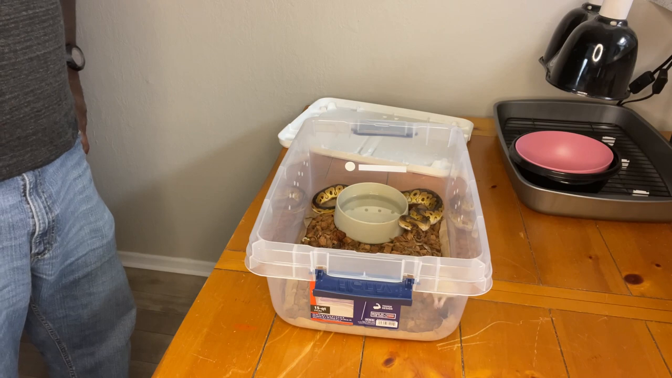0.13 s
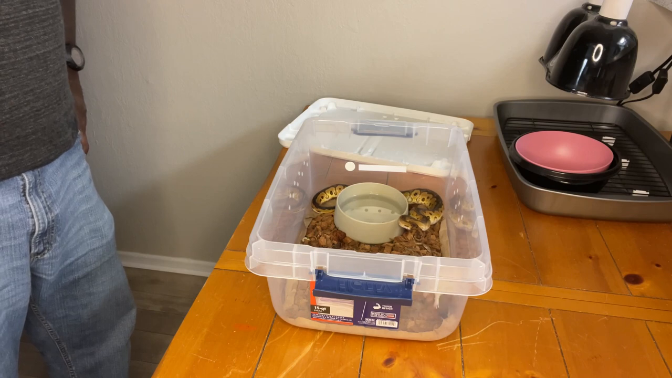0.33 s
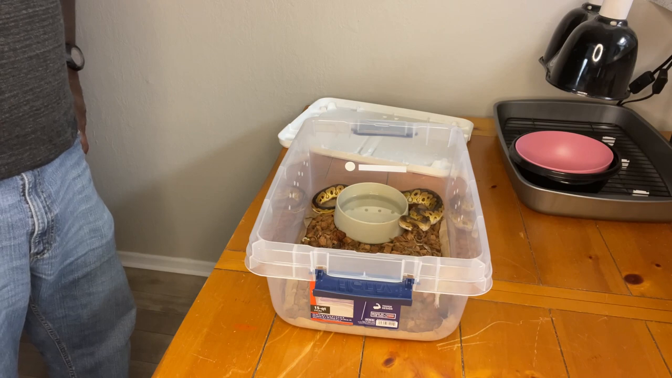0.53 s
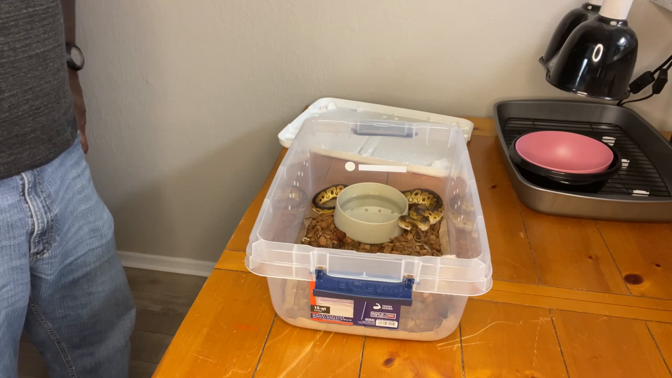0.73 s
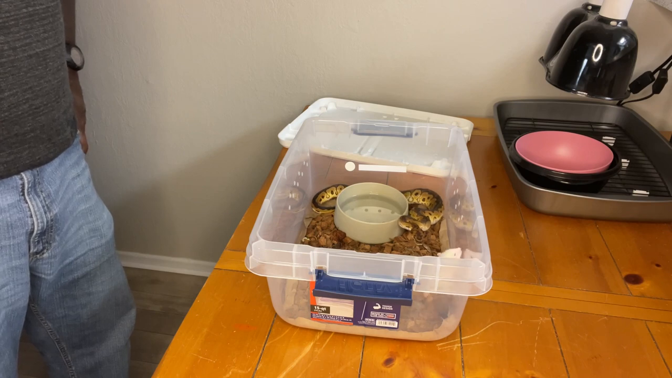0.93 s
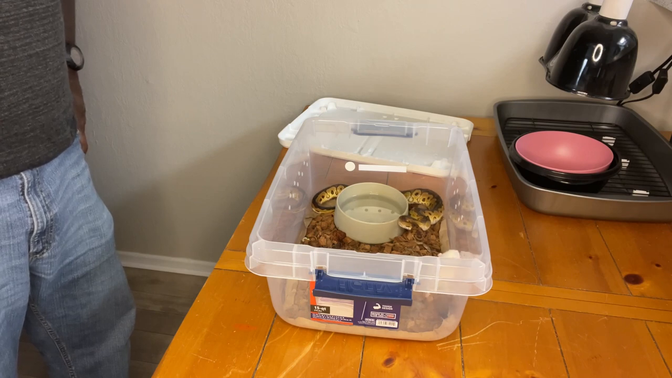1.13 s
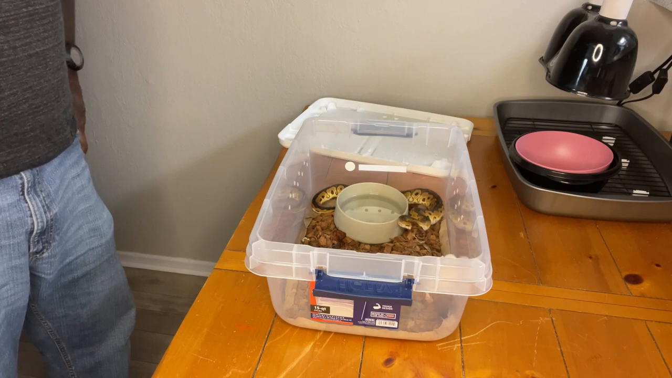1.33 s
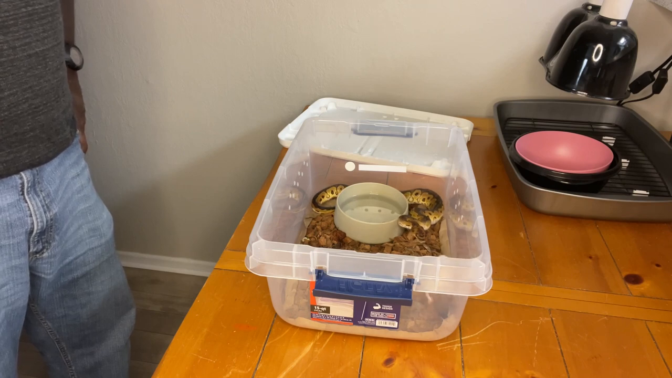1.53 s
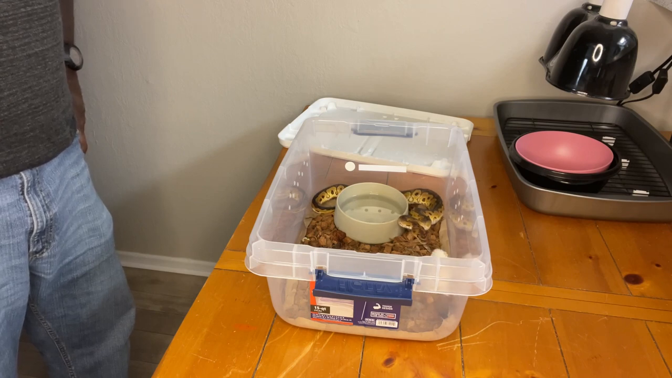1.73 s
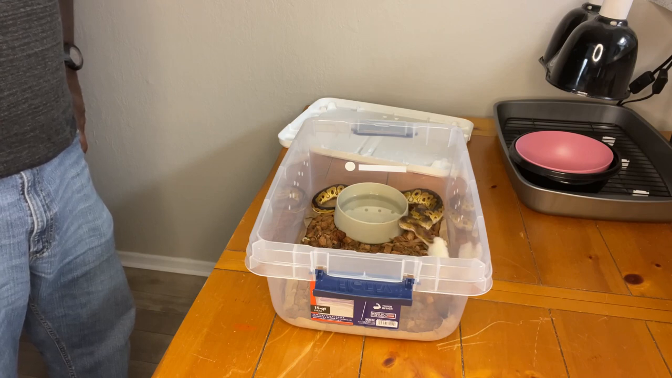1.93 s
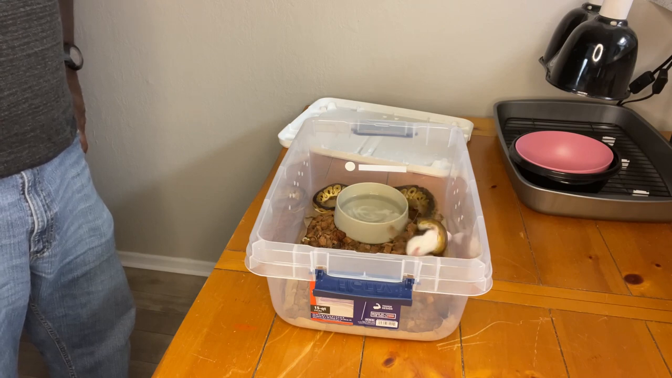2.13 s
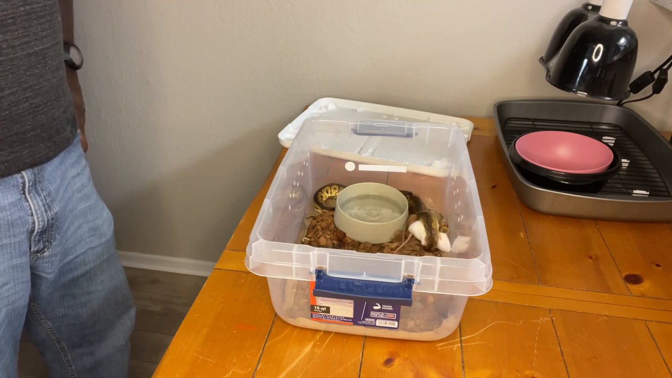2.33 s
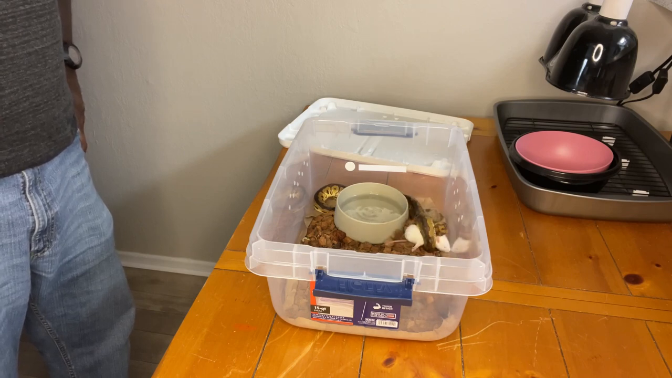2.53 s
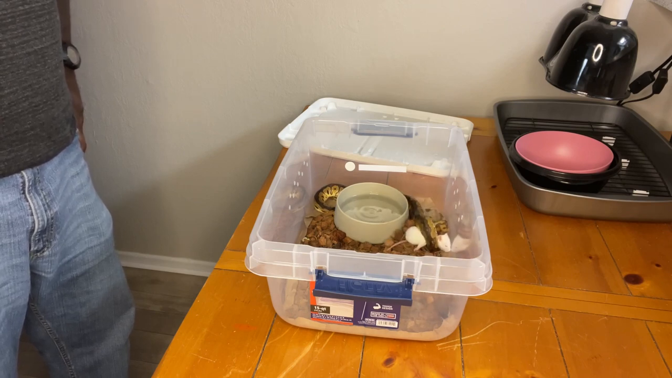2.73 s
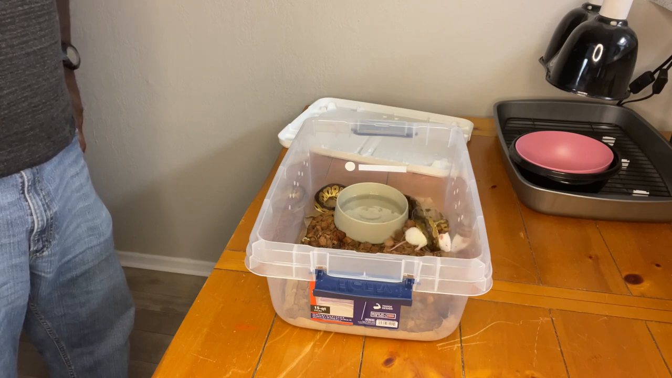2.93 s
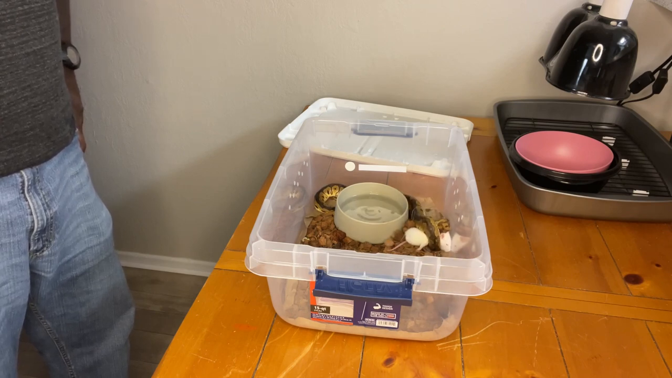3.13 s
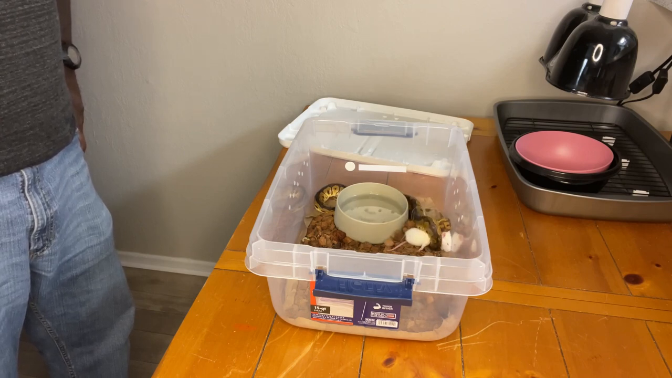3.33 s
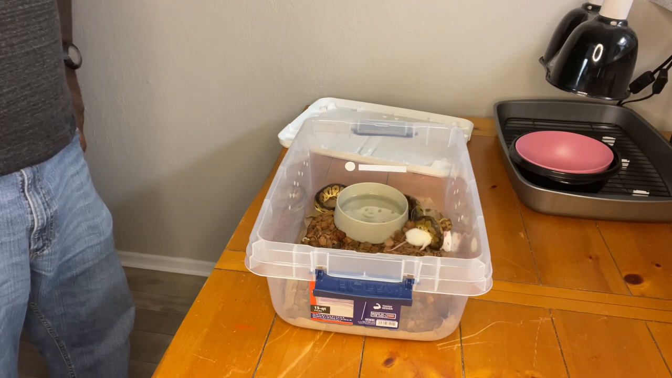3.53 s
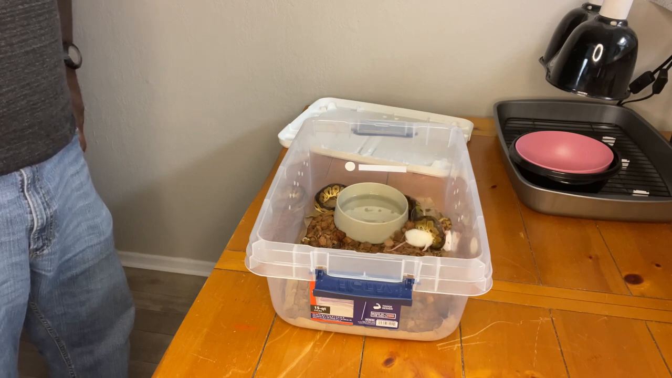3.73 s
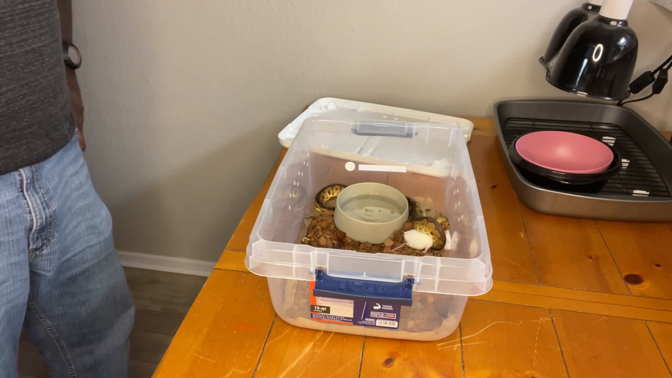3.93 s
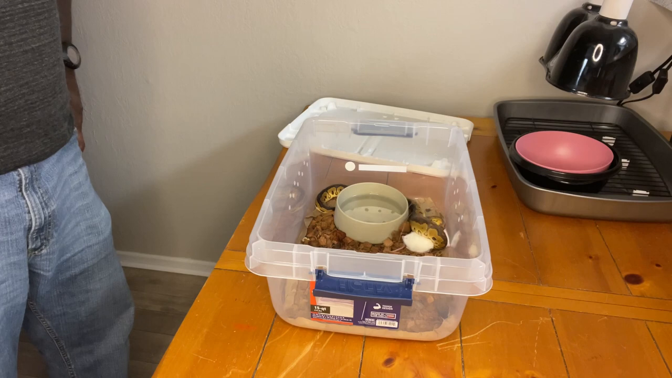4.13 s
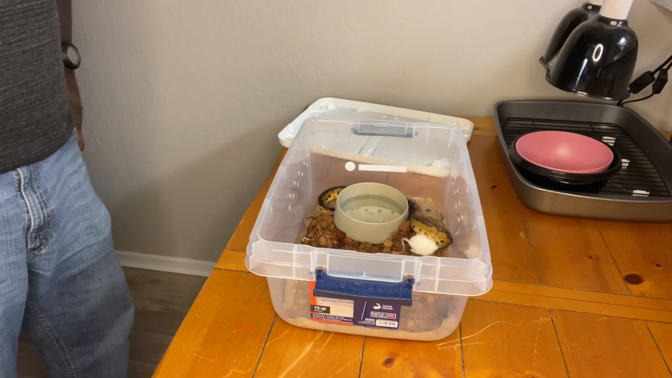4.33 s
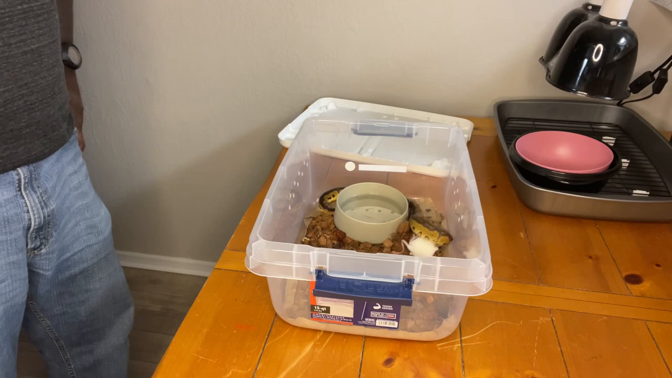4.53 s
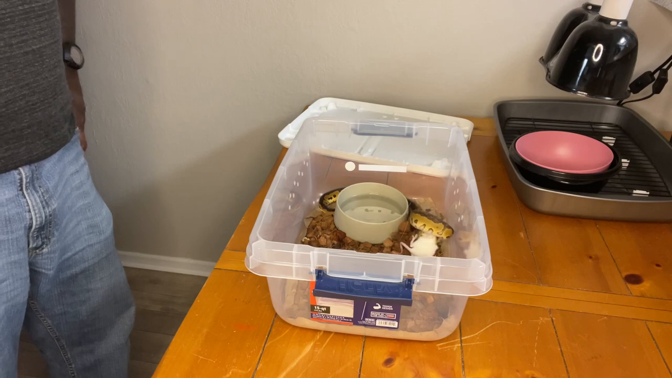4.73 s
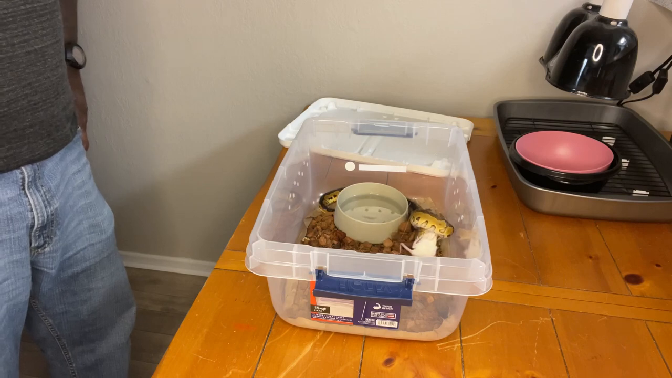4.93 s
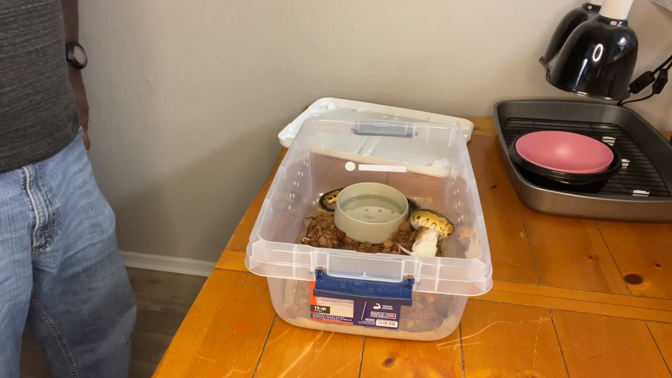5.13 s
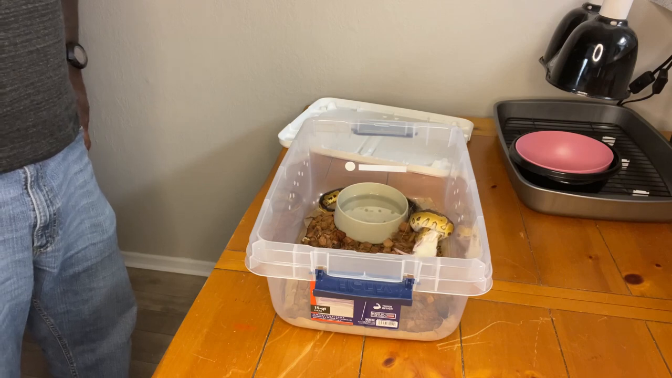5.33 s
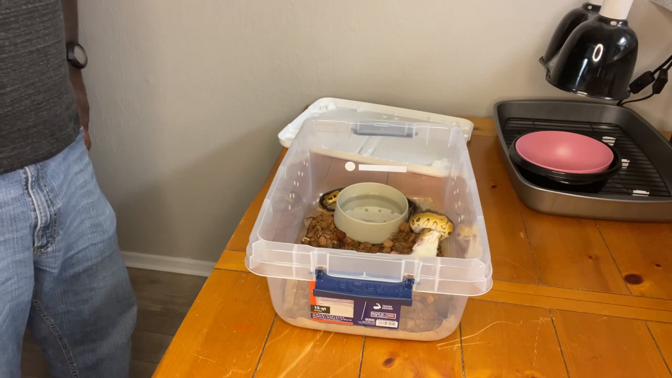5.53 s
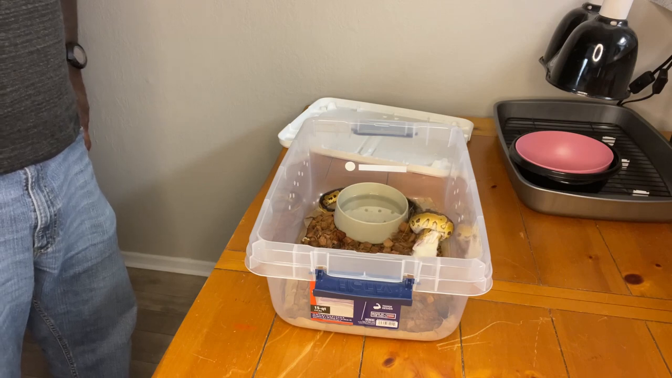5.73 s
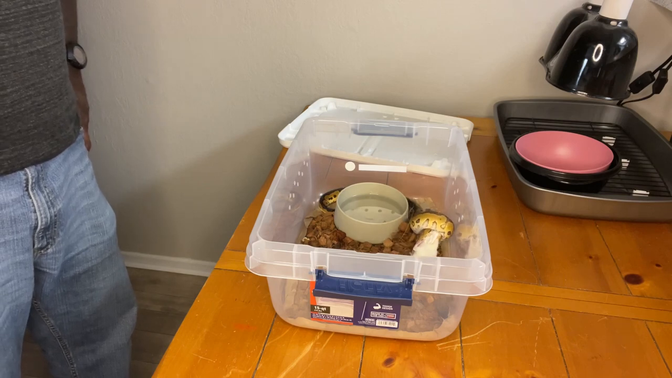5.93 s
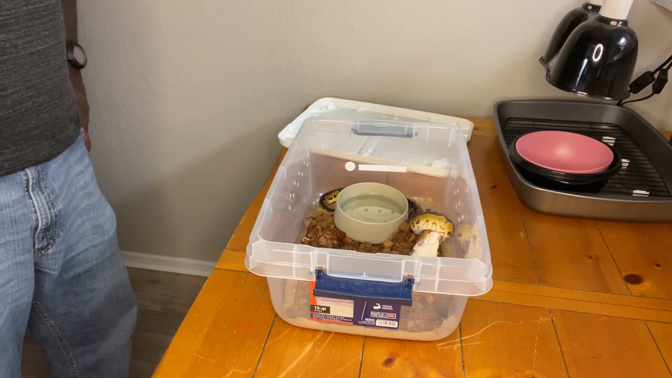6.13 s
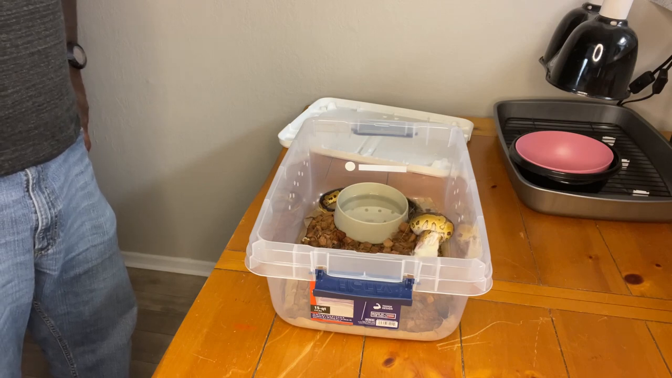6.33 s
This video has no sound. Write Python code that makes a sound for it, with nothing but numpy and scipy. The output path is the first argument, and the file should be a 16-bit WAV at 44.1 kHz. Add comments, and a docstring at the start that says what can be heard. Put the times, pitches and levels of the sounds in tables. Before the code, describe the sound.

Snake strikes a young rat in a plastic tub: a thump, bedding rustle, shrill raspy squeals, a sharp snap, then weak fading squeaks.

```python
"""In a small quiet room, a snake strikes a young rat in an open plastic tub on a wooden table.
The rat gives six shrill squeals, harmonics and turbulent noise shaped by mouth resonances, weaker at the end.
The strike thumps the tub, whose damped modes ring. Bark bedding rustles as clumped noise grains,
and chips snap as short decaying sines, one loudly as the snake tightens its coil.
Low rumble, faint hiss and a thin far whine lie behind."""
import sys
import numpy as np
from scipy import signal
from scipy.fft import rfft, irfft
from scipy.io import wavfile
from scipy.ndimage import uniform_filter1d

SR = 44100
rng = np.random.default_rng(int(sys.argv[2]) if len(sys.argv) > 2 else 0)


def store_wav(level_fs):
    """Save 16-bit WAV to argv[1]."""
    pcm = np.round(np.clip(np.atleast_2d(level_fs), -1, 1) * 32767)
    wavfile.write(sys.argv[1], SR, pcm.T.astype(np.int16))


N = 286341  # samples in the scene

# Throat and mouth resonances for the tone. Each row: frequency in Hz, relative gain in dB.
THROAT_RESONANCES = [(700, -34), (1150, -16.5), (1550, -8), (2300, -5.5), (3100, -11), (3700, -14),
                     (4600, -1), (5500, 6), (6400, -5.5), (8100, -5.5), (9500, -12), (13200, -7.5),
                     (16000, -6)]
# The same passage for turbulent air. Each row: frequency in Hz, relative gain in dB.
AIR_RESONANCES = [(300, -33.5), (750, -25), (1100, -13), (1800, -14), (2350, -12.5), (3200, -25),
                  (4000, -8), (4800, -3.5), (6100, 5), (7400, -3), (9000, -1), (11200, -1.5),
                  (13500, -10.5), (16000, -21)]
# Period doubling grows with pitch and rasp; it has its table level at EASY_PITCH_HZ without rasp.
HALF_LINES_DB, EASY_PITCH_HZ = -24.5, 2600
HALF_DB_PER_OCTAVE, HALF_DB_PER_RASP = 17.5, 19


def squeals(wobble=0.0074, quaver=.025, jitter=.058, air=.75, mouth_air=0.2, mouth_width_hz=1100,
            flutter_db=1.75, rattle_db=2.0):
    """Source-filter principle: folds whistle, double their period under strain and break into a rasp."""
    pitch, level, rasp, mouth_hz, lift_db, nasal_db, top_db = voice_controls()
    octaves_up = np.log2(np.maximum(pitch, 1) / EASY_PITCH_HZ)
    half_db = HALF_LINES_DB + HALF_DB_PER_OCTAVE * octaves_up + HALF_DB_PER_RASP * rasp

    # random pitch deviation smears the high harmonics most
    deviation = (wobble + quaver * rasp) * drift(80) + jitter * rasp * drift(800)
    phase = 2 * np.pi * np.cumsum(pitch * (1 + deviation)) / SR

    tone, sounding = np.zeros(N), level > 0
    for order in range(1, 17):  # odd orders lie halfway between the harmonics
        hz = order * pitch[sounding] / 2
        in_mouth = 1 / (1 + ((hz - mouth_hz[sounding]) / mouth_width_hz) ** 2)
        audible = np.clip((18000 - hz) / 1000, 0, 1)
        gain = from_db(half_db[sounding] * (order % 2) + (lift_db[sounding] + 9.0) * in_mouth)
        tone[sounding] += audible * gain * np.cos(order * phase[sounding] / 2)
    tone = even(colour(tone, THROAT_RESONANCES))

    # turbulent air escapes each time the folds open, and also sounds the mouth's resonance
    puffs = rng.standard_normal(N) * (1 + 0.56 * np.cos(phase))
    hiss = even(colour(puffs, AIR_RESONANCES))
    shrill = drift(mouth_width_hz) * np.cos(2 * np.pi * np.cumsum(mouth_hz) / SR)
    hiss = hiss + mouth_air * from_db(lift_db) * shrill

    voice = tone * np.sqrt(1 - rasp ** 2) + air * rasp * hiss
    voice = band(voice, [(6500, -23.5), (7900, 9.0), (9800, -35.0)], nasal_db)
    voice = even(band(voice, [(11000, -38), (13300, -5)], top_db))
    return voice * level * from_db(flutter_db * drift(90) + rattle_db * rasp * drift(450))


# Each squeal starts as a rasp, clears and roughens again. Each row: clear from in seconds, clear until
# in seconds (both mid-change), rasp from 0 to 1, rasp while clear from 0 to 1, mouth resonance in Hz
# at the mean of the pitch points, its relative lift in dB at full effort, setting of the nasal band
# near 8 kHz in dB, setting of the top treble in dB.
SQUEALS = [(2.344, 2.422, 0.61, .08, 12720, 15, -4.5, -1), (2.601, 2.654, 0.73, 0.1, 13100, -7.5, -5, 13),
           (4.679, 4.879, .9, .29, 10410, 16.5, 6.5, -3), (5.162, 5.243, .88, 0.04, 10850, 12, -2, 8.5),
           (5.586, 5.622, 0.99, .62, 12600, -4.5, -11, 16.5), (5.952, 5.985, 0.6, 0.4, 12000, 3, -12, -6.5)]
# Pitch contour before random deviation, one list a squeal. Each row: time in seconds, pitch in Hz.
PITCH = [
    [(2.09, 2100), (2.12, 2310), (2.2, 2420), (2.27, 2440), (2.325, 2330), (2.38, 2205), (2.435, 2080)],
    [(2.586, 2811), (2.61, 2812), (2.63, 2659), (2.66, 2398), (2.69, 2388)],
    [(4.655, 3140), (4.685, 3260), (4.708, 3120), (4.737, 2850), (4.76, 2880), (4.778, 2760), (4.79, 2840),
     (4.815, 2610), (4.865, 2470), (4.9, 2430)],
    [(5.129, 2390), (5.155, 2470), (5.167, 2635), (5.19, 2680), (5.212, 2580), (5.24, 2470), (5.34, 2290)],
    [(5.58, 1600), (5.68, 1470)],
    [(5.935, 1500), (5.985, 1410)],
]
# Breath behind each squeal, one list a squeal. Each row: time in seconds, relative level in dB.
EFFORT = [
    [(2.09, -51), (2.238, -38.5), (2.322, -39.5), (2.378, -37), (2.432, -42.5), (2.44, -45.5)],
    [(2.586, -46.5), (2.606, -35), (2.648, -32.5), (2.69, -44)],
    [(4.655, -41.5), (4.683, -32), (4.703, -30), (4.727, -34), (4.841, -30.5), (4.9, -42)],
    [(5.129, -43), (5.137, -36.5), (5.331, -45.5), (5.34, -49.5)],
    [(5.582, -48), (5.598, -46.5), (5.67, -50.5), (5.68, -51.5)],
    [(5.935, -57), (5.941, -58.5), (5.951, -69.5), (5.985, -76)],
]
VOICE_DB, ATTACK_DB_PER_S, RELEASE_DB_PER_S = 3.37, 3499.5, 1096.5
BREAK_S = .012  # time to pass between rasp and whistle
# the mouth resonance follows pitch by a power law; its lift in dB changes per dB of effort
MOUTH_FOLLOWS_PITCH, LIFT_PER_DB = 0.52, 2.25


def voice_controls():
    """Articulation: pitch, level, rasp and mouth shape move together through each squeal."""
    t, controls = np.arange(N) / SR, np.zeros((7, N))
    for row, contour, effort in zip(SQUEALS, PITCH, EFFORT):
        clear_from, clear_until, rough, clear, mouth_hz, lift_db, nasal_db, top_db = row
        pitch_s, hz = np.transpose(contour)
        effort_s, db = np.transpose(effort)
        start, end = effort_s[0], effort_s[-1]
        near = (t > start - .02) & (t < end + .06)
        s = t[near]

        pitch, breath_db = np.interp(s, pitch_s, hz), np.interp(s, effort_s, db)
        attack_db = ATTACK_DB_PER_S * np.maximum(start - s, 0)
        release_db = RELEASE_DB_PER_S * np.maximum(s - end, 0)
        level = from_db(VOICE_DB + breath_db - (attack_db + release_db))

        inside_s = np.minimum(s - clear_from, clear_until - s)
        whistling = np.clip(.5 + inside_s / BREAK_S, 0, 1)
        rasp = np.clip(rough + (clear - rough) * whistling, 0, 1)
        resonance_hz = mouth_hz * (pitch / hz.mean()) ** MOUTH_FOLLOWS_PITCH
        resonance_db = lift_db + LIFT_PER_DB * (breath_db - db.max())
        controls[:, near] = np.broadcast_arrays(
            pitch, level, rasp, resonance_hz, resonance_db, nasal_db, top_db)
    return controls


# A faint early tap, the strike, the tumble after it and later kicks against the tub.
# Each row: start in seconds, relative level in dB, hardness of the contact as a cutoff in Hz.
BLOWS = [(0.565, -60, 166), (2.001, -27, 1453), (2.0149, -44.5, 260), (2.041, -41.5, 507.5),
         (2.434, -61.5, 247), (4.313, -57, 172.4), (4.69, -69.5, 900), (5.085, -69, 898.4),
         (5.136, -67.5, 1221), (5.44, -67.5, 614)]
# Modes of tub and table. Each row: frequency in Hz, relative level in dB, time to decay by 60 dB
# in seconds, left over right in dB.
TUB_MODES = [(69, -13, 0.65, 2), (150, -1.5, 0.37, 9), (190, -5, 0.096, 9.5), (241, -5, 0.18, 5.5),
             (303, -1, 0.25, 0.5), (370, -1, 0.17, 3.5), (408, 0, 0.21, -9.5), (432, 9, 0.061, -12),
             (495, -2.5, 0.13, -6.5), (529.4, -16, 0.22, 1.5), (550, -9.5, 0.22, -10), (625, -1.5, .16, -6),
             (646.5, -10.5, 0.12, 3.5), (755, -3.5, 0.033, 6.5), (814, -4, 0.091, -3),
             (822, -11.5, 0.029, -5.5), (942, -27, .14, 3.5)]
BUMP_DB, BUMP_HZ = -17, 1800  # each shove also bumps the tub, this much weaker and this hard


def thud(ring_db=-4.5, knock_db=1.0, knock_s=.016):
    """Modal excitation: soft bodies give a dull knock and set low modes of tub and table ringing."""
    t = np.arange(SR // 4) / SR
    push, knock = np.zeros(N), np.zeros((2, N))
    knock_shape = [(100, -17.0), (300, 0), (600, 1.5), (850, -1.0), (1150, -24), (3000, -45.0)]
    bumps = [(s, db + BUMP_DB, BUMP_HZ) for s, _, _, db in SHOVES]
    for s, db, contact_hz in BLOWS + bumps:
        soft = signal.butter(2, contact_hz, fs=SR, output="sos")  # a softer contact passes less treble
        start = round(s * SR)
        span = slice(start, start + len(t))
        push[span] += from_db(db) * signal.sosfilt(soft, t == 0)
        crush = rms_one(colour(rng.standard_normal((2, len(t))), knock_shape))
        knock[:, span] += from_db(db + knock_db) * signal.sosfilt(soft, crush * np.exp(-t / knock_s))

    modes = np.zeros((2, N))
    for k, (hz, db, t60, pan_db) in enumerate(TUB_MODES):
        sides_db = pan_db / 2 * np.array([[1], [-1]])
        modes += (-1) ** k * from_db(db + ring_db + sides_db) * ring(push, hz, t60)
    return modes + knock


# The loudest chips snapping. Each row: start in seconds, relative level in dB.
SNAPS = [(0.377, -50), (1.2008, -49), (1.5365, -46), (1.689, -47), (1.921, -45.5), (1.96, -45),
         (2.0395, -21), (2.0414, -22.5), (2.4334, -32.5), (3.2162, -53), (3.5283, -56), (3.968, -57),
         (4.0497, -45), (4.1631, -18.5), (4.3317, -42), (4.465, -50.5)]


def snaps():
    """Impulse response: each breaking chip gives one very short crack."""
    clicks = np.zeros(N)
    for s, db in SNAPS:
        clicks[round(s * SR)] = from_db(db)
    return chip(clicks)


# Resonances of a bark chip. Each row: frequency in Hz, relative level in dB, time to decay by 60 dB
# in seconds.
CHIP_MODES = [(2430, -16, .004), (3740, -8, 0.007), (6200, -5, 0.0034), (10100, -7, 0.003),
              (12960, -9, .003)]


def chip(clicks):
    """Damped resonance: a click makes a bark chip ring for a few milliseconds."""
    return sum((-1) ** k * from_db(db) * ring(clicks, hz, t60)
               for k, (hz, db, t60) in enumerate(CHIP_MODES))


# Spectrum of the rubbing bedding. Each row: frequency in Hz, relative density in dB per Hz.
BEDDING = [(120, -39.5), (200, -6.5), (371, -4.5), (430, 8), (534, -7.5), (827, -1), (1680, 1), (2420, 3.5),
           (3180, -2), (4840, 3), (7900, -3.5), (13200, -1), (15500, -11)]


def rustle(grains_per_s=3500, clump_db=1.3, ticks_per_s=50, tick_db=-13.5, sheen_db=-7.0):
    """Granular friction: rubbing chips make clumped noise of flickering treble, with single ticks."""
    grains = rng.standard_normal((2, N)) * (rng.random((2, N)) < grains_per_s / SR)
    rub = diffuse(colour(grains, BEDDING))
    rub = band(rub, [(3000, -25), (8000, -3.5)], sheen_db * drift(14) - 2.5)
    rub = rms_one(rub) * from_db(clump_db * drift(24))
    clicks = rng.standard_normal(N) * (rng.random(N) < ticks_per_s / SR)
    ticks = rms_one(chip(clicks))
    return (rub + from_db(tick_db) * from_tub(ticks)) * sliding()


# The snake's shoves through the bedding. Each row: start of full force in seconds, rise in seconds,
# hold in seconds, relative level in dB.
SHOVES = [(1.204, 0.031, 0.023, -70.5), (1.347, 0.07, 0.0074, -62), (1.484, 0.095, 0.011, -72.5),
          (1.538, 0.013, 0.044, -59), (1.7, .025, 0.0046, -64), (1.88, 0.14, 0.045, -71.5),
          (1.981, 0.014, 0.096, -45), (2.12, 0.015, 0.12, -51), (3.943, 0.0059, .035, -60.5),
          (4.035, 0.0067, 0.013, -59), (4.168, 0.0073, 0.022, -49), (4.259, 0.24, 0.097, -54.5),
          (5.11, .05, .01, -68)]
# Slow creeping under the shoves. Each row: time in seconds, relative level in dB.
CREEP = [(0, -85), (1.15, -85), (1.4, -83), (1.95, -96), (2.3, -51.5), (2.55, -72.5), (3.0, -84),
         (3.65, -78.5), (4.3, -64), (4.6, -72), (5.8, -83), (6.49, -84)]
SHOVE_RISE_DB, SETTLE_DB_PER_S = 17.5, 162.5  # gain over one rise time; rate of dying away


def sliding():
    """Addition of powers: each shove builds, holds and settles on top of the slow creeping."""
    t, power = np.arange(N) / SR, from_db(in_time(CREEP)[0]) ** 2
    for s, rise_s, hold_s, db in SHOVES:
        rise_db = SHOVE_RISE_DB * np.maximum(s - t, 0) / rise_s
        settle_db = SETTLE_DB_PER_S * np.maximum(t - s - hold_s, 0)
        power += from_db(db - np.minimum(rise_db + settle_db, 100)) ** 2
    return np.sqrt(power)


# Phase lead of the left channel for sound from the tub; negative means that the right leads.
# Each row: frequency in Hz, phase in radians.
LEFT_LEAD = [(60, 0), (950, -.9), (2300, -1.7), (3100, -2.9), (4650, -4.1), (5700, -4.5), (6600, -4.4),
             (7700, -3.3), (9000, -4.4), (11100, -5.8), (12800, -5.9), (14300, -5.2), (16000, -4.8)]


def from_tub(x):
    """Interaural phase: sound from the tub reaches the right channel first."""
    turn = np.exp(.5j * at_hz(LEFT_LEAD, bins(x)) * np.array([[1], [-1]]))
    return irfft(rfft(x) * turn, N)


# Reverberation of the room, before any shortening. Each row: frequency in Hz, time to decay by 60 dB
# in seconds.
ROOM_T60 = [(100, 0.71), (1000, 0.59), (2500, 0.36), (5500, 0.39), (10000, 0.27), (16000, 0.14)]


def room(x, shorten=1):
    """Diffuse reverberation: dense reflections of unit mean energy die band by band."""
    t = np.arange(SR // 2) / SR
    spectrum, hz = rfft(diffuse(rng.standard_normal((2, len(t))))), bins(t)
    edges = [0, 300, 1500, 3500, 7000, 11000, SR / 2]
    tail = np.zeros((2, len(t)))
    for lo, hi in zip(edges, edges[1:]):
        t60 = shorten * at_hz(ROOM_T60, (lo + hi) / 2)
        reflections = irfft(spectrum * ((hz >= lo) & (hz < hi)), len(t))
        tail += reflections * np.exp(-np.log(1000) * t / t60)
    tail *= t > .002  # silence before the first reflections
    return signal.fftconvolve(x[None], rms_one(tail) / np.sqrt(len(t)), axes=1)[:, :N]


# Spectrum of the background. Each row: frequency in Hz, relative density in dB per Hz.
AIR = [(12, -27.5), (20, -10), (49, 1.5), (87, -6), (103, -16.5), (282, -27.5), (362, -28), (452, -28.5),
       (1230, -39.5), (2090, -41), (2330, -47), (3850, -42.5), (5230, -55), (12800, -47), (15500, -57.5)]
AIR_DB = -64  # before the side balance and the wavering


def background(whine_hz=2170, whine_db=-93.0, waver_db=4.5):
    """Shaped noise: wavering low rumble and faint hiss of the house, with a thin far whine."""
    air = rms_one(diffuse(colour(rng.standard_normal((2, N)), AIR)))
    air = air * from_db(AIR_DB + np.array([[1.2], [-1.2]]))
    air = band(air, [(100, -1), (250, -28)], waver_db * drift(8) - 1.0)
    whine = drift(220) * np.cos(2 * np.pi * whine_hz * np.arange(N) / SR)
    return air + from_db(whine_db) * whine


# Likeness of left and right in diffuse sound. Each row: frequency in Hz, correlation from -1 to 1.
LIKENESS = [(30, 1), (120, 0.26), (300, 0.25), (1500, .15), (5000, 0), (9000, 0), (12000, 0.96)]


def diffuse(pair):
    """Partial coherence: two unrelated signals become a left and right that are partly alike."""
    mid, side = rfft(pair)
    alike = np.clip(at_hz(LIKENESS, bins(pair)), -.98, .98)
    return irfft(np.sqrt(1 + alike) * mid + np.sqrt(1 - alike) * side * [[1], [-1]], pair.shape[-1])


def ring(clicks, hz, t60):
    """Damped oscillation: a unit click sets a sine of initial height 1 ringing."""
    r, w = from_db(-60 / (t60 * SR)), 2 * np.pi * hz / SR
    return signal.lfilter([0, r * np.sin(w)], [1, -2 * r * np.cos(w), r * r], clicks + 1e-18)


def drift(rate):
    """Low-passed noise: a random wander of spread 1, up to about rate turns a second."""
    white = rng.standard_normal(N)
    return rms_one(irfft(rfft(white) / (1 + (bins(white) / rate) ** 4), N))


def colour(x, spectrum):
    """Linear filtering: give x a smooth spectral shape."""
    return irfft(rfft(x) * from_db(at_hz(spectrum, bins(x))), x.shape[-1])


def band(x, spectrum, level_db):
    """Time-varying filtering: raise or lower part of the spectrum by a level that may move."""
    return x + (from_db(level_db) - 1) * colour(x, spectrum)


def even(x):
    """Power normalization: hold a voice steady over about nine milliseconds."""
    return x / np.sqrt(np.abs(uniform_filter1d(x ** 2, size=400)) + 1e-12)


def rms_one(x):
    """Mean-square normalization: scale to unit power."""
    return x / np.sqrt(np.mean(x ** 2) + 1e-20)


def from_db(db):
    """Logarithmic level: decibels to amplitude gain."""
    return 10 ** (np.asarray(db) / 20)


def in_time(rows):
    """Linear interpolation: each column of a curve, sample by sample."""
    s, *columns = np.transpose(rows)
    return [np.interp(np.arange(N) / SR, s, c) for c in columns]


def at_hz(points, hz):
    """Logarithmic interpolation: read a table on a log-frequency axis."""
    f, value = np.transpose(points)
    return np.interp(np.log(np.maximum(hz, 1)), np.log(f), value)


def bins(x):
    """Fourier analysis: frequencies of the spectrum of x in Hz."""
    return np.fft.rfftfreq(x.shape[-1], 1 / SR)


def scene():
    """Superposition: sounds from the tub, its quick reflections, the room's answer and the background."""
    rat, cracks, blow = squeals(), snaps(), thud()
    voice = from_tub(rat) + from_db(-4) * room(rat, shorten=0.19) + from_db(-9.5) * room(rat)
    chips = from_tub(cracks) + from_db(-9) * room(cracks, shorten=0.25)
    strike = from_tub(blow) + from_db(-10.5) * room(blow.mean(axis=0), shorten=0.77)
    inside = voice + chips + strike + rustle()
    return inside * from_db([[.2], [-.2]]) + background()


def record(dry):
    """Band limitation: a steep elliptic low-pass cuts the top above 15.9 kHz."""
    return signal.sosfilt(signal.ellip(12, .1, 80, 15900, fs=SR, output="sos"), dry)


dry = scene()
out = record(dry)
store_wav(out)
```